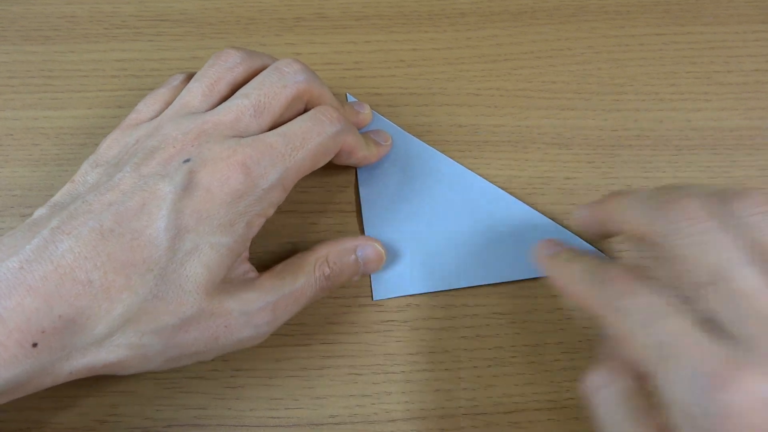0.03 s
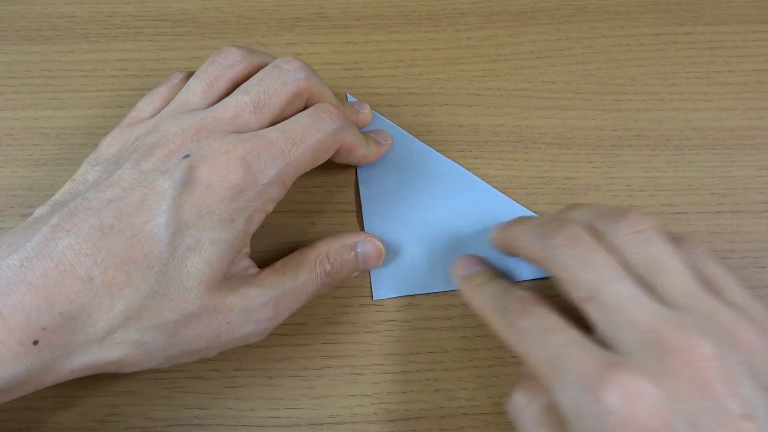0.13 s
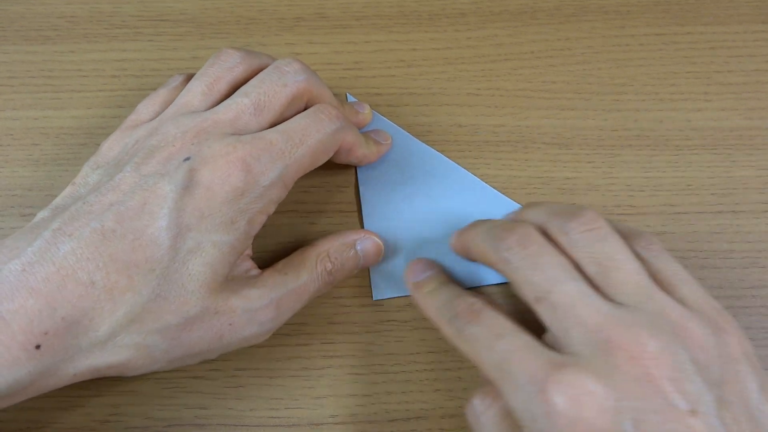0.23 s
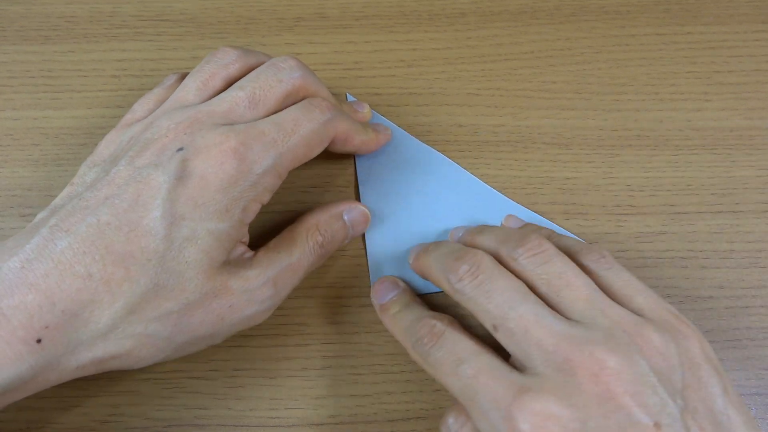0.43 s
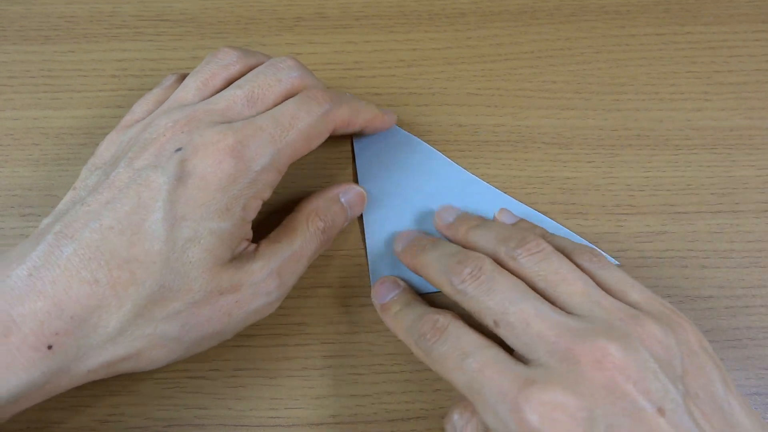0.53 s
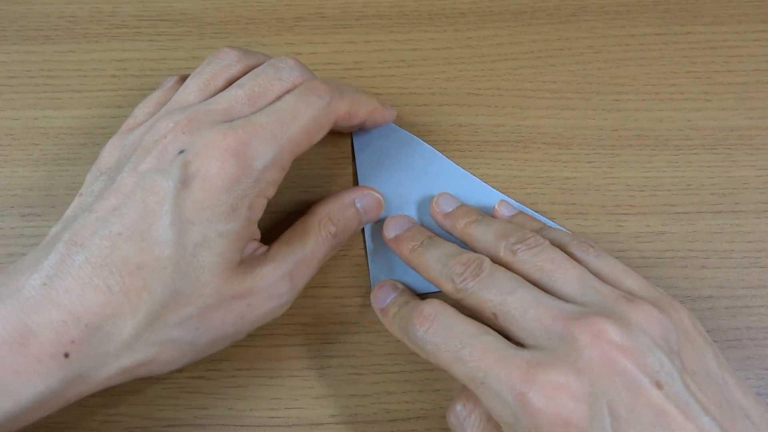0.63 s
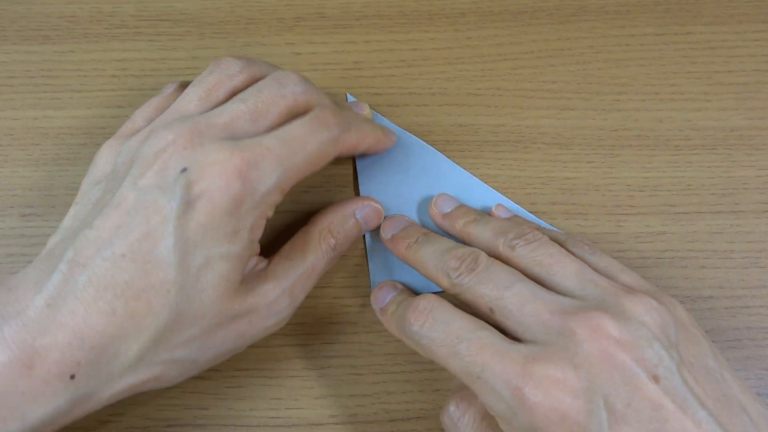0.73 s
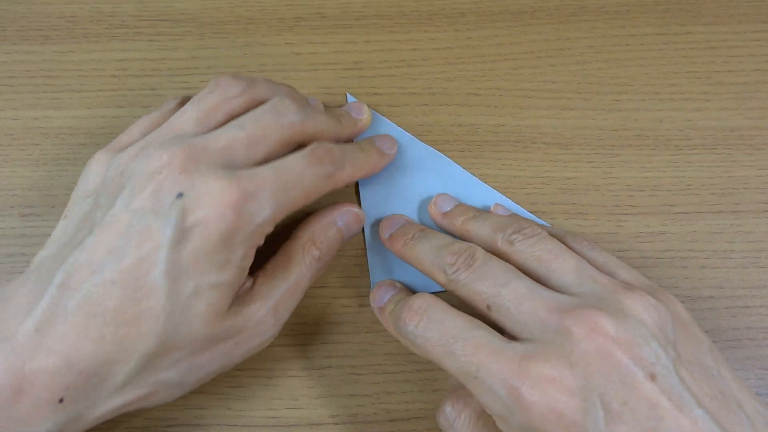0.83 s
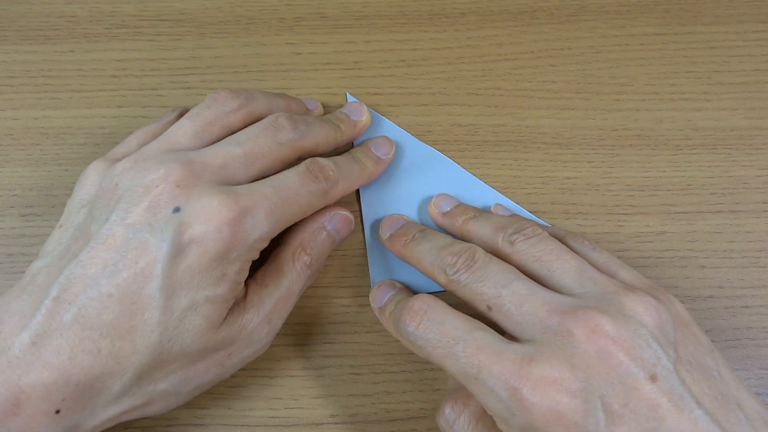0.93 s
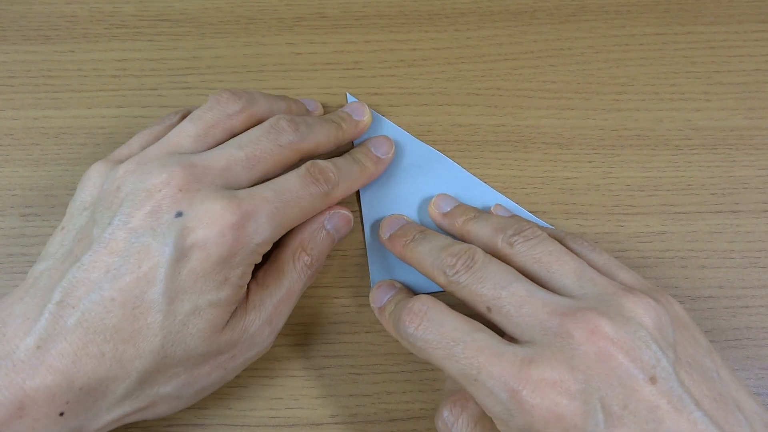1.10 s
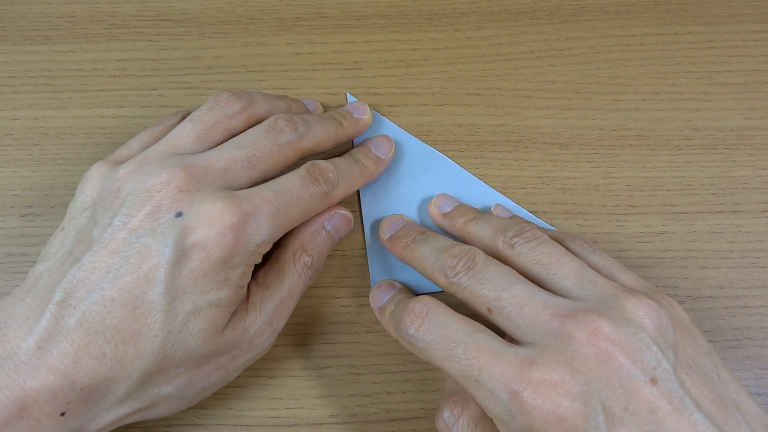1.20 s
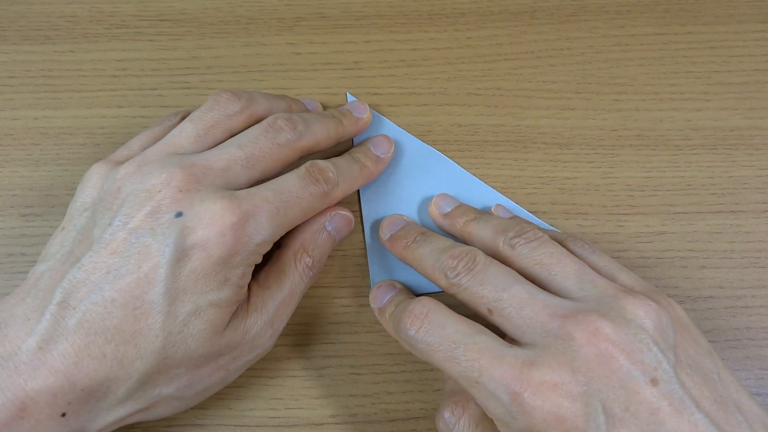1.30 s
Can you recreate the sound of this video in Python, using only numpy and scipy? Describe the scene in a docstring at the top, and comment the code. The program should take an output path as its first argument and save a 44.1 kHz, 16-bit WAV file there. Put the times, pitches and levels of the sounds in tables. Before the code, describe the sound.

Paper hisses softly as fingers smooth a fold on a wooden table in four quick strokes. The sheet gives one sharp little snap during the second, then ticks faintly as it settles, close by in a quiet room.

```python
"""Smoothing folded paper

Fingers flatten a paper triangle on a wooden table in a small, quiet room. Stick-slip friction of
skin on fibres makes four hissing strokes; in the second the stiff sheet buckles with one sharp snap.
Fingertips land with soft pats, and the fold ticks faintly as it settles under the hands."""
import sys
import numpy as np
from scipy import signal
from scipy.fft import rfft, irfft
from scipy.io import wavfile
from scipy.ndimage import uniform_filter1d

SR = 44100
rng = np.random.default_rng(int(sys.argv[2]) if len(sys.argv) > 2 else 0)


def file_out(sig):
    """Save sig as 16-bit WAV at sys.argv[1]."""
    # one column per channel
    cols = np.atleast_2d(sig).T
    # limit, then scale
    lim = np.clip(cols, -1, 1)
    pcm = np.round(lim * 32767).astype(np.int16)
    wavfile.write(sys.argv[1], SR, pcm)


N = 59535
TIME = np.arange(N) / SR

# spectrum of room air and hiss: (frequency [Hz], relative density [dB])
AIR_SPECTRUM = [(15, -53), (30, -30), (55, -25), (110, -21.5), (230, -10.5), (400, -9.5), (600, -6),
                (1050, -4), (1350, -7.5), (1900, -6.5), (2250, -8.5), (2600, -4), (2950, -15), (3350, -12),
                (3700, -11), (4400, -9), (5400, -16), (7000, -13), (8200, -15.5), (11000, -16)]
# likeness of the air at left and right: (frequency [Hz], correlation [-1 to 1])
AIR_CORRELATION = [(60, .58), (130, 0.67), (270, 0.034), (580, -0.41), (1230, -0.22), (2620, 0.16),
                   (5600, 0.59), (11000, 0.8)]

# friction envelope of each stroke: (time [s], level [dB])
SLIDE_LEVELS = [(0, -57.5), (.012, -54.5), (.036, -53), (.08, -59.5), (.1, -69), (.128, -68)]
SWEEP_LEVELS = [(.128, -58), (.131, -60), (.139, -50), (.162, -46.5), (.235, -46.5), (.29, -48.5),
                (.325, -51), (.375, -51.5), (.405, -59.5), (.44, -66.5)]
PRESS_LEVELS = [(.465, -63), (.495, -49.5), (.53, -45.5), (.565, -46.5), (.62, -52.5), (.655, -51),
                (.69, -67)]
SETTLE_LEVELS = [(.68, -68), (.73, -70.5), (.752, -63), (.78, -66), (.805, -63.5), (.84, -71.5),
                 (.9, -67.5), (.96, -82), (1.35, -100)]
# friction spectrum of each stroke: (frequency [Hz], relative density [dB])
SLIDE_SPECTRUM = [(40, -53), (300, -29), (800, -12), (1800, -17.5), (2600, -7), (3000, -10.5), (3400, 0.5),
                  (3950, -0.5), (4700, -8), (6000, -4), (8300, -8.5), (9600, -7), (11000, -7.5)]
SWEEP_SPECTRUM = [(40, -57), (300, -25), (850, -15), (1600, -22.5), (2400, -12.5), (3000, -13), (4200, -3),
                  (5200, -1.5), (6800, -2.5), (8000, -2.5), (9000, -3), (10000, 2.5), (11000, -3.5)]
PRESS_SPECTRUM = [(40, -42), (300, -25.5), (900, -25), (1800, -22), (2400, -18), (2950, -17), (4200, -10),
                  (5500, -8.5), (7100, -4.5), (8200, -9.5), (9400, -2), (11000, -1)]
SETTLE_SPECTRUM = [(40, -42), (300, -23), (900, -15), (2000, -20), (3200, -7), (4500, 1.5), (6500, 3),
                   (8200, -1), (9500, -0.5), (11000, -1)]

# light contacts: (time [s], level [dB], centre [Hz], T60 [s], bandwidth [octaves])
FOLD_TICKS = [(.1292, -52.5, 3440, 0.045, 0.21), (.1293, -51, 5500, .012, 3.1),
              (.2336, -55, 3400, 0.0099, 1.2), (.4396, -55.5, 1960, 0.036, 1.8),
              (.4862, -50, 2720, 0.017, 1.3), (.6445, -56.5, 3730, 0.024, 1.1),
              (.909, -64.5, 2620, 0.021, 0.84), (1.109, -67, 2530, 0.023, 1.5)]
FINGER_PATS = [(.130, -66.5, 860, 0.077, .9), (.441, -64, 564, 0.12, 0.95), (.644, -62.5, 900, 0.14, 1.3),
               (1.177, -65, 1140, 0.033, 1.1)]

SNAP_S = .24665
# broad resonances of the buckling sheet: (frequency [Hz], bandwidth [Hz], gain [dB])
SHEET_RESONANCES = [(827, 145, -16), (1460, 490, -20.5), (2574, 545, -7.5), (3694, 605, -0.5),
                    (4620, 890, 1), (6160, 900, 3), (7170, 600, 2), (9560, 1000, -3), (11000, 960, 1)]
# first reflections of the snap: (delay [s], gain [dB])
EARLY_REFLECTIONS = [(.00101, -10.5), (.0029, -18.5), (.0071, -23.5)]
# narrow modes that ring on after the snap: (frequency [Hz], level [dB], T60 [s])
RINGING_MODES = [(786, -54, 0.09), (3720, -39.5, 0.048), (3960, -55, 0.04), (3972, -39, .05),
                 (4310, -47, .07), (5405, -39, .08), (5880, -47, 0.091), (7255, -48, 0.17),
                 (8385, -51, 0.083), (10220, -44, 0.16), (10600, -46, 0.044), (10937, -44.5, 0.14)]


def from_db(db):
    """Amplitude grows tenfold for every 20 dB."""
    return 10 ** (np.asarray(db) / 20)


def unit_rms(x):
    """Normalisation to a mean power of one."""
    return x / np.sqrt(np.mean(x ** 2) + 1e-20)


def per_bin(points):
    """Interpolation over log frequency at every bin of the spectrum."""
    hz, value = np.transpose(points)
    return np.interp(np.log(np.fft.rfftfreq(N, 1 / SR) + 1), np.log(hz), value)


def coloured(x, spectrum):
    """Filtering by multiplication of spectra; the result has unit rms."""
    return unit_rms(irfft(rfft(x) * from_db(per_bin(spectrum)), N))


def stereo(pair, side_db):
    """Sum and difference of uncorrelated mid and side signals give width."""
    side = from_db(side_db) * pair[1]
    return np.array([pair[0] + side, pair[0] - side])


def decay(start, t60):
    """Exponential damping: a sudden onset, then a fall of 60 dB in t60 seconds."""
    return (TIME >= start) * from_db(-60 * np.maximum(TIME - start, 0) / t60)


def room_air(level_db=-68.5):
    """Stationary noise, widest in the midrange, where left and right correlate least."""
    correlation = np.clip(per_bin(AIR_CORRELATION), -1, 1)
    mid, side = rfft(coloured(rng.standard_normal((2, N)), AIR_SPECTRUM))
    side = side * np.sqrt((1 - correlation) / (1 + correlation + 1e-6))
    return from_db(level_db) * irfft(np.array([mid + side, mid - side]), N)


def friction(spectrum, slips_per_s=14000, spread_db=1, flutter_db=.5):
    """Stick-slip friction: skin plucks paper fibres, and the dense, uneven slips merge into hiss."""
    slips = rng.random((2, N)) < slips_per_s / SR
    sizes = from_db(spread_db * np.minimum(rng.exponential(1, (2, N)), 5))
    signs = rng.choice([-1, 1], (2, N))
    hiss = stereo(coloured(slips * sizes * signs, spectrum), side_db=-14.5)
    # the level wavers every few milliseconds
    flutter = uniform_filter1d(uniform_filter1d(rng.standard_normal(N), 260), 260)
    return hiss * from_db(flutter_db * unit_rms(flutter))


def stroke(levels, spectrum):
    """Amplitude modulation: friction noise swells and fades with one rub of the fingers."""
    times, db = np.transpose(levels)
    return friction(spectrum) * from_db(np.interp(TIME, times, db, left=-np.inf, right=-np.inf))


def contacts(rows):
    """Modal overlap: a light contact excites modes so crowded that they ring as a band of noise."""
    out = np.zeros((2, N))
    for start, db, hz, t60, octaves in rows:
        edges = np.clip(hz * 2 ** (np.array([-.5, .5]) * octaves), 20, SR / 2 - 1)
        band = signal.butter(2, edges, "band", fs=SR, output="sos")
        bandwidth_gain = np.sqrt(SR / 2 / (edges[1] - edges[0]))   # same power in any band
        burst = rng.standard_normal((2, N)) * decay(start, t60) * bandwidth_gain
        out += from_db(db) * stereo(signal.sosfilt(band, burst + 1e-18), side_db=-7)
    return out


def resonance(x, hz, width_hz):
    """A damped oscillator: two poles, with unit gain at the peak."""
    radius = np.exp(-np.pi * width_hz / SR)
    feedback = [1, -2 * radius * np.cos(2 * np.pi * hz / SR), radius ** 2]
    return signal.lfilter([1, 0, -1], feedback, x + 1e-18) * (1 - radius ** 2) / 2


def reverberation(x, db, t60, delay_s):
    """Diffuse reflections act as a convolution with decaying noise."""
    response = rng.standard_normal((2, N)) * decay(delay_s, t60)
    response = stereo(response / np.linalg.norm(response[0]), side_db=-14.5)
    return from_db(db) * signal.fftconvolve(x[None], response, axes=1)[:, :N]


def snap():
    """Buckling sends one impulse into the sheet's resonances; table, hands and room reflect it."""
    impulse = np.zeros(N)
    impulse[int(SNAP_S * SR)] = from_db(4.5)
    direct = sum((-1) ** k * from_db(db) * resonance(impulse, hz, width)
                 for k, (hz, width, db) in enumerate(SHEET_RESONANCES))
    early = sum(from_db(db) * np.roll(direct, int(delay * SR)) for delay, db in EARLY_REFLECTIONS)
    hands_and_table = reverberation(direct, db=-8, t60=.052, delay_s=.0025)
    room = reverberation(direct, db=-20, t60=.36, delay_s=.0063)
    return direct + early + hands_and_table + room


def sheet_ring(flap_db=-53, flap_hz=1580, flap_t60=.23, flap_octaves=1.7):
    """Free vibration after the snap: the stiff sheet's modes die away and its loose layer flaps."""
    modes = sum((-1) ** k * from_db(db) * decay(SNAP_S, t60) * np.sin(2 * np.pi * hz * (TIME - SNAP_S))
                for k, (hz, db, t60) in enumerate(RINGING_MODES))
    flap = contacts([(SNAP_S, flap_db, flap_hz, flap_t60, flap_octaves)])
    low_cut = signal.butter(2, 420, "high", fs=SR, output="sos")   # the ringing and flap carry little bass
    return signal.sosfilt(low_cut, modes + flap + 1e-18)


def scuff(peak_s=.448, half_width_s=.0065, peak_db=-48.5):
    """Sliding friction swells briefly as a landing fingertip skids."""
    swell = from_db(peak_db) / (1 + ((TIME - peak_s) / half_width_s) ** 2)
    return friction(PRESS_SPECTRUM) * swell


def scene():
    """Superposition: paper and fingers just right of centre, over the room's air."""
    air = room_air()
    paper = stroke(SLIDE_LEVELS, SLIDE_SPECTRUM) + stroke(SWEEP_LEVELS, SWEEP_SPECTRUM)
    paper += contacts(FOLD_TICKS) + contacts(FINGER_PATS)
    paper += snap() + sheet_ring() + scuff()
    paper += stroke(PRESS_LEVELS, PRESS_SPECTRUM) + stroke(SETTLE_LEVELS, SETTLE_SPECTRUM)
    pan = from_db([[-.25], [.25]])
    return air + paper * pan


def record(dry):
    """A steep low-pass filter removes the treble above about 11 kHz."""
    return signal.sosfilt(signal.ellip(14, .1, 80, 11030, fs=SR, output="sos"), dry)


dry = scene()
out = record(dry)
file_out(out)
```